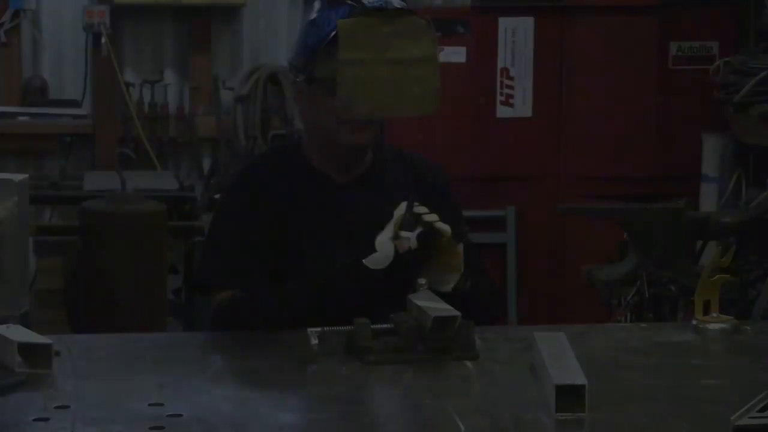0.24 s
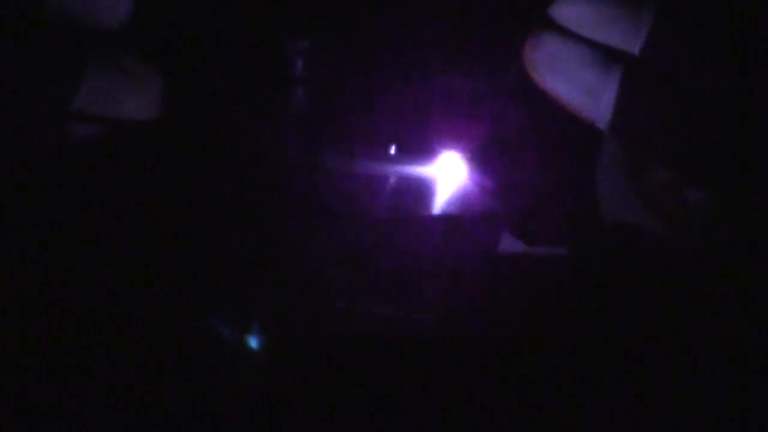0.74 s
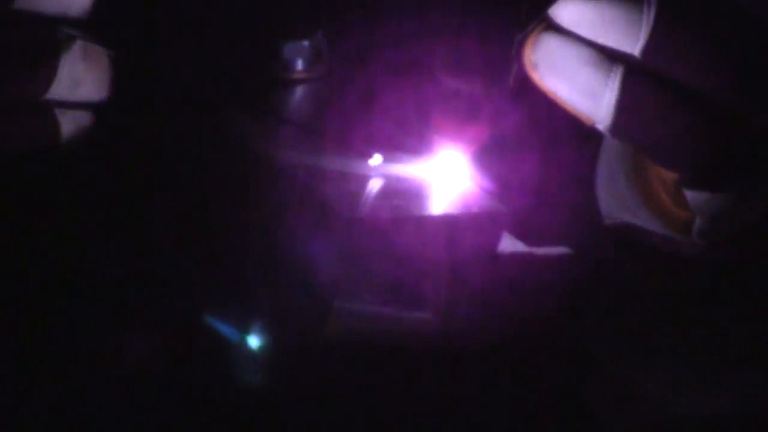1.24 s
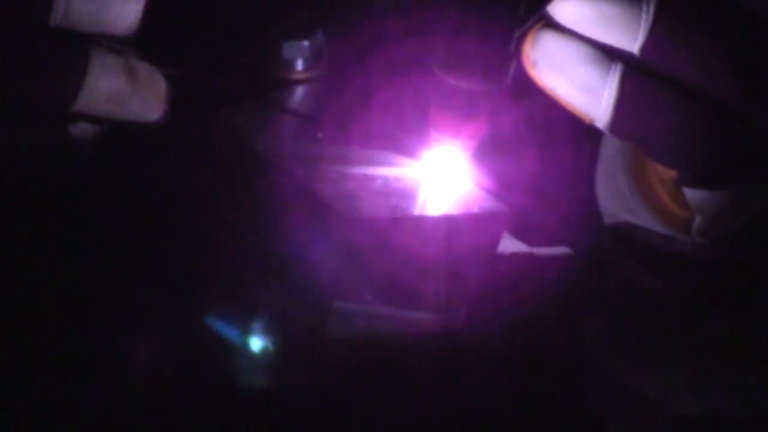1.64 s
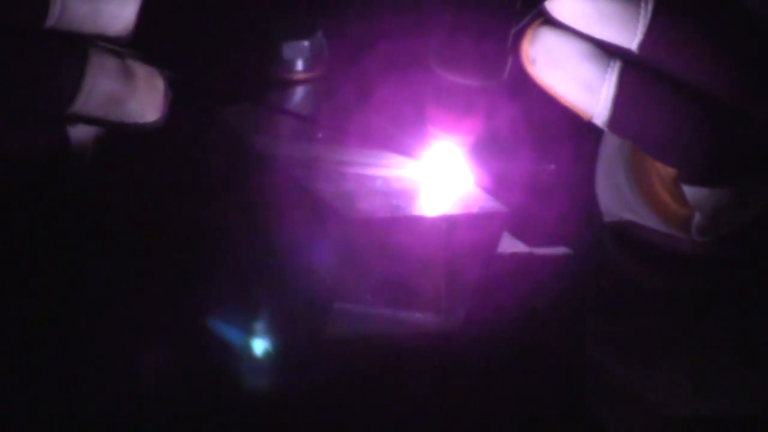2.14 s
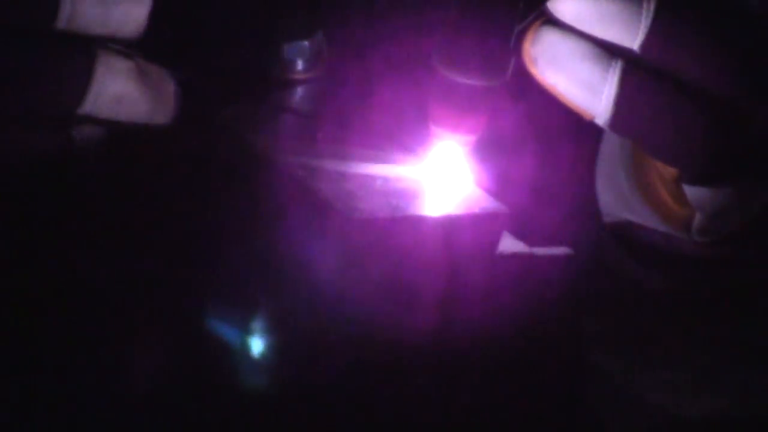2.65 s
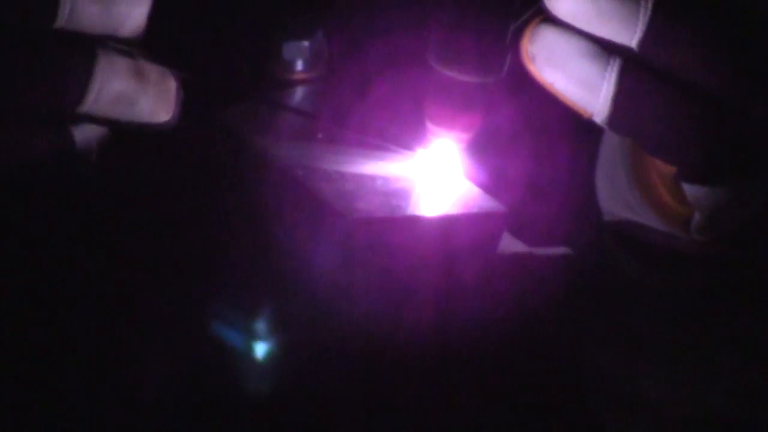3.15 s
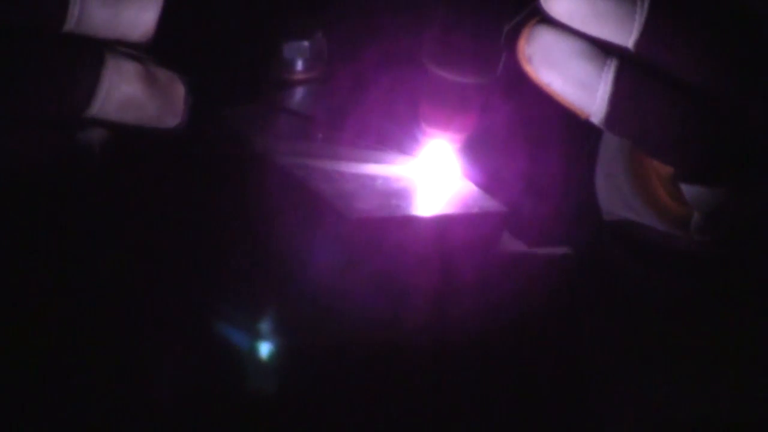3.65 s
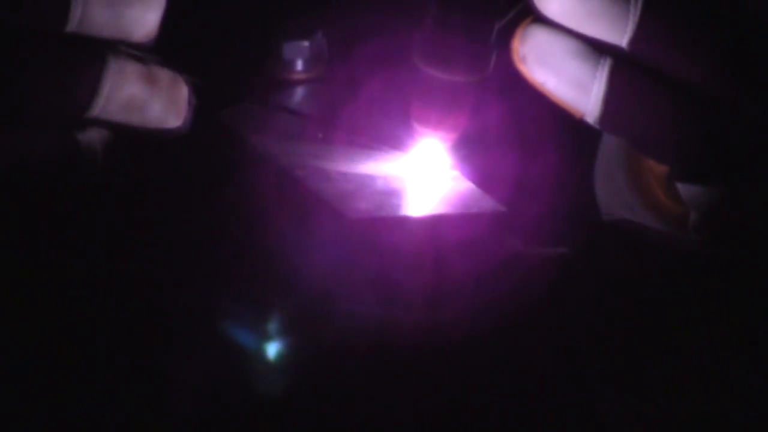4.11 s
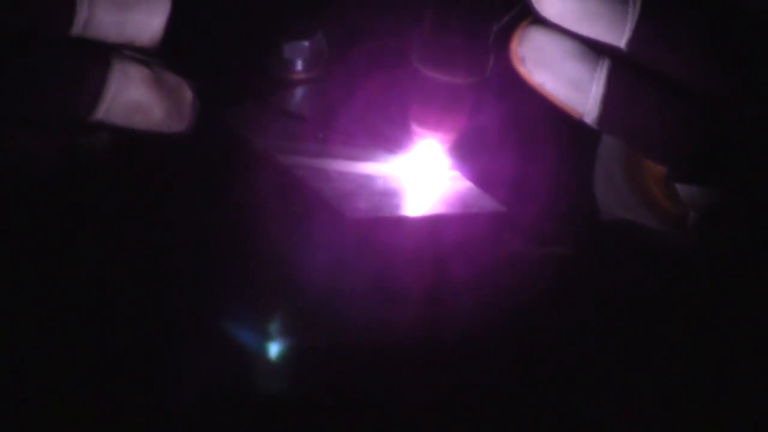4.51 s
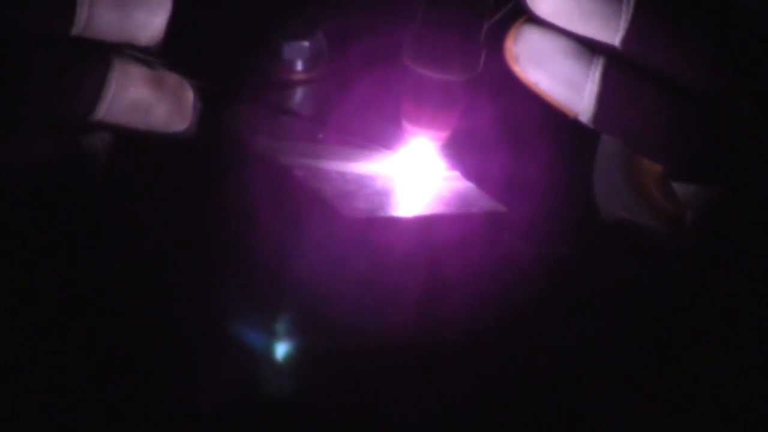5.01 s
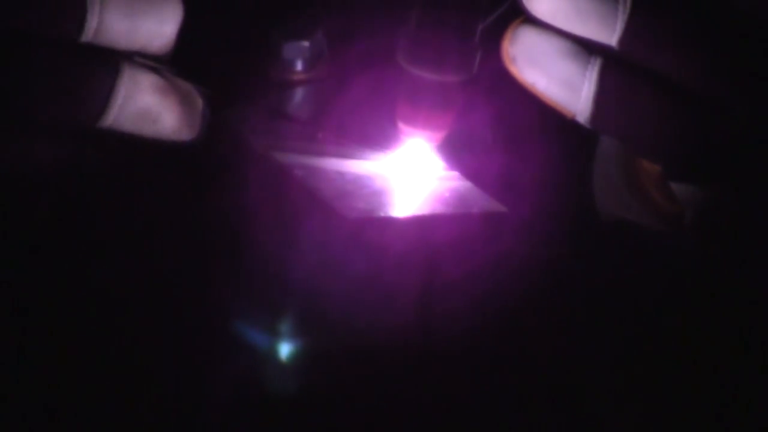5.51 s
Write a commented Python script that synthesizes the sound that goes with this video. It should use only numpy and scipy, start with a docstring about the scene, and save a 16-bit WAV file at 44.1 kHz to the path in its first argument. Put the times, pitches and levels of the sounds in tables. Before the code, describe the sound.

A fan and mains hum, then a spark hiss and popping strike start a hard, raspy welding buzz that holds steady to the end.

```python
"""An AC TIG arc burns on an aluminium tube: it snaps twice in every cycle of its current, a hard, even buzz.
Before it, a welder rustles and squeaks faintly, then the starter spark hisses in bursts.
The arc catches with a whistle and a run of pops; sizzling, thumps, more pops and a slowly growing low tone follow.
Echoes from the steel bench and the tube follow each snap. A fan drones and the mains hums in the workshop,
and the recorder's limiter pushes this background down as the current comes up."""
import sys
import numpy as np
from scipy import signal
from scipy.fft import rfft, irfft
from scipy.io import wavfile
from scipy.ndimage import map_coordinates

SR = 44100
rng = np.random.default_rng(int(sys.argv[2]) if len(sys.argv) > 2 else 0)


def generate_wav(sig):
    """Save sig (samples, or channels by samples) to the path in sys.argv[1] as 16-bit PCM at SR."""
    pcm = np.round(np.clip(np.atleast_2d(sig).T, -1, 1) * 32767).astype(np.int16)
    wavfile.write(sys.argv[1], SR, pcm)


N = 254456

ARC_HZ = 120.156  # cycles of the arc current per second; the mains hum has the same pitch
FIRST_SNAP_S = .6627  # the arc strikes
REVERSAL_S = .002317  # from the weak snap to the strong one in each cycle
MELT_S = .912  # the metal gives way to a pool
# the current ramps up after the strike, then holds
ARC_DB, FULL_CURRENT_S, CURRENT_POWER = 7, 0.99, 1.14

# tone colour of the arc: (frequency [Hz], relative level [dB])
SNAP_COLOUR = [(120, -31), (360, -4), (600, -2.5), (720, 1.5), (900, 3), (1300, -2), (1750, 7),
               (2600, -2.5), (3600, 0.5), (5000, -2), (7000, -4.5), (9000, -4), (12000, -5.5),
               (15700, -14.5)]
# spells in which the arc sizzles and thumps more, on the cold metal and later on the pool:
# (time [s], half length [s], added sizzle [dB], added thumping [dB]), both before the arc's own gain
LIVELY_SPELLS = [(0.81, 0.088, -15.5, -6), (1.47, 0.11, -33, -12), (2.732, 0.11, -27, -15),
                 (3.035, 0.21, -12.5, -23), (3.43, .14, -17.5, -39), (5.597, .08, -23, -12)]


def undb(db):
    """Decibels to gain."""
    return 10 ** (np.asarray(db) / 20)


def unit(x):
    """Scale to an average (rms) strength of 1."""
    return x / np.sqrt(np.mean(x ** 2))


def clock():
    """Time of every sample, in seconds."""
    return np.arange(N) / SR


def curves(table, t):
    """Read the columns of a table at times t, with straight lines between its rows."""
    s, *columns = np.transpose(table)
    return [np.interp(t, s, column) for column in columns]


def swell(t, centre_s, half_s):
    """A smooth rise and fall."""
    return np.exp(-((t - centre_s) / half_s) ** 2)


def colour(x, points):
    """Shape the tone through (Hz, dB) points with a filter that never answers before its input."""
    hz, db = np.transpose(points)
    size = 8192
    grid = np.maximum(np.arange(size // 2 + 1) * SR / size, 1)
    level_db = np.interp(np.log(grid), np.log(hz), db)
    # folding the cepstrum (spectrum of the log spectrum) puts the response after time zero
    cepstrum = irfft(np.log(undb(level_db)))
    cepstrum[1:size // 2] *= 2
    cepstrum[size // 2 + 1:] = 0
    response = irfft(np.exp(rfft(cepstrum)))
    return signal.fftconvolve(x, response)[:N]


def band_noise(hz, width_hz):
    """Noise in one steep resonance, rms 1."""
    f = np.arange(N // 2 + 1) * SR / N
    spectrum = rfft(rng.standard_normal(N))
    resonance = 1 / (1 + (np.abs(f - hz) / width_hz * 2) ** 4)
    return unit(irfft(spectrum * resonance, N))


def clicks(times, sizes):
    """Very short impulses, placed exactly even between two samples."""
    index = (times * SR).astype(int)[:, None] + np.arange(-7, 9)
    offset = index - times[:, None] * SR
    shape = np.sinc(offset) * np.cos(np.pi * offset / 16) ** 2
    return np.bincount(index.ravel(), (shape * sizes[:, None]).ravel(), N)[:N]


def puffs(times, sizes, hz):
    """Hot gas swells and collapses: one pressure swing each."""
    index = (times * SR).astype(int)[:, None] + np.arange(-256, 256)
    u = (np.pi * np.reshape(hz, (-1, 1)) * (index / SR - times[:, None])) ** 2
    swing = (2 * u - 1) * np.exp(-u)
    return np.bincount(index.ravel(), (swing * sizes[:, None]).ravel(), N)[:N]


def arc_gain(t):
    """Strength of the arc: silent before the strike, then growing with the current until it holds."""
    current = np.interp(t, [FIRST_SNAP_S, FULL_CURRENT_S], [0, 1])
    return undb(ARC_DB) * current ** CURRENT_POWER


def cycle_starts():
    """Times at which the electrode turns positive."""
    return np.arange(FIRST_SNAP_S, N / SR, 1 / ARC_HZ)


def workshop(air_db=-21.5, level_db=4.5):
    """Moving air is coloured noise; the fan's throbbing drone is noise in narrow bands."""
    # tone colour of the air: (frequency [Hz], relative level [dB])
    air_colour = [(15, -82), (25, -8), (64, -12.5), (117, -12), (170, -14), (249, -8), (317, -13),
                  (775, -19.5), (988, -26.5), (1190, -19.5), (1290, -24), (6920, -43), (12900, -55),
                  (16000, -50)]
    # the fan's drone: (frequency [Hz], width [Hz], level before level_db [dB])
    drone_bands = [(264.8, 12, -21.5), (245.2, 37.3, -18.5), (358, 16, -38), (466, 19, -40),
                   (813, 34, -41.5)]
    air = unit(colour(rng.standard_normal(N), air_colour)) * undb(air_db)
    fan = sum(undb(db) * band_noise(hz, width) for hz, width, db in drone_bands)
    return (air + fan) * undb(level_db)


def hum_and_arc_tone(hum_db=-20.0, waver_db=-24.5, waver_width_hz=12, arc_tone_db=-33, creep_db_per_s=4.0):
    """A wavering mains hum; once the arc burns, its own steady low tone at the same pitch slowly grows."""
    t = clock()
    # arc_tone_db is the level of the arc's tone at the moment of full current
    arc_tone = undb(arc_tone_db + creep_db_per_s * (t - FULL_CURRENT_S)) * (t >= FIRST_SNAP_S)
    steady = np.sqrt(2) * np.sin(2 * np.pi * ARC_HZ * t) * (undb(hum_db) + arc_tone)
    return steady + undb(waver_db) * band_noise(ARC_HZ, waver_width_hz)


def handling(bend_hz=260, waver_hz=50):
    """Faint squeaks, each rising and falling in pitch with its strength, and some rustling before the strike."""
    # thin squeaks as the welder settles:
    # (time [s], half length [s], highest pitch before wavering [Hz], level [dB])
    squeak_events = [(0.198, .038, 10570, -41), (.345, .055, 10000, -47), (0.377, .035, 10900, -47)]
    # tones within a squeak: (frequency ratio, relative level [dB])
    squeak_tones = [(.63, -7), (1, 6), (1.27, -3)]
    # gloves and sleeves rustle: (time [s], half length [s], peak level [dB])
    rustle_events = [(.087, 0.019, -34), (0.18, .003, -31), (.256, .003, -32), (0.365, .05, -38),
                     (0.465, 0.039, -40)]
    t = clock()
    squeak = np.zeros(N)
    for s, half, top_hz, db in squeak_events:
        bend = bend_hz * np.minimum(((t - s) / half) ** 2, 10)
        hz = top_hz - bend + waver_hz * band_noise(0, 300)
        phase = 2 * np.pi * np.cumsum(hz) / SR
        tone = sum(undb(tone_db) * np.sin(ratio * phase) for ratio, tone_db in squeak_tones)
        squeak += np.sqrt(2) * undb(db) * swell(t, s, half) * tone
    rustle = sum(undb(peak_db) * swell(t, s, half) for s, half, peak_db in rustle_events)
    return squeak + rustle * band_noise(11100, 4800)


def starter(spark_hz=560, depth=0.44):
    """A rapid train of high-voltage sparks hisses: noise pulsing in strength, in bursts that die away."""
    # bursts of the starter spark: (time [s], hiss level at its start [dB], decay [s])
    burst_events = [(.602, -21, 0.0041), (.6125, -4, 0.0013), (0.612, -11.5, 0.14), (0.662, -1.5, 0.0028),
                    (0.712, -11, 0.0096)]
    # tone colour of the spark: (frequency [Hz], relative level [dB])
    spark_colour = [(880, -53), (1500, -6), (2210, -6), (2390, -8), (2590, -28), (2910, -6), (3520, -11),
                    (4460, -15), (7390, -7), (12000, -2), (16000, -2.5)]
    t = clock()
    bursts = np.zeros(N)
    for s, db, decay in burst_events:
        bursts += undb(db) * np.exp(-np.maximum(t - s, 0) / decay) * (t >= s)
    train = rng.standard_normal(N) * (1 + depth * np.sin(2 * np.pi * spark_hz * t))
    return unit(colour(train, spark_colour)) * bursts


def whistle(hz=3550, sag_hz_per_s=1200, waver_hz=45, loudest_s=.703, half_s=0.037, level_db=-19,
            linger_db=-16, width_hz=110):
    """The torch whistles, a little falling, as the arc catches; narrow noise rings on until the metal melts."""
    t = clock()
    pitch = hz - sag_hz_per_s * (t - loudest_s) + waver_hz * band_noise(0, 300)
    tone = np.sqrt(2) * np.sin(2 * np.pi * np.cumsum(pitch) / SR)
    tone = tone * undb(level_db) * swell(t, loudest_s, half_s)
    # linger_db is the level before the arc's own gain
    ringing = band_noise(hz, width_hz) * undb(linger_db) * arc_gain(t) * (t < MELT_S)
    return tone + ringing


def buzz(scatter_db=0.43, jitter_s=1.2e-6, snap_db=-3.3):
    """The arc relights at both reversals of the current: a weak snap, then a strong one."""
    # balance of the two reversals: (time [s], weak snap relative to strong snap [dB])
    snap_balance = [(.9, -3.5), (1.35, -7), (2.3, -3.5), (2.9, -1), (3.72, -6), (3.83, -1), (4.2, -1),
                    (4.5, -4.5), (5.77, -8)]
    starts = cycle_starts()
    chance = rng.standard_normal((len(starts), 4)).T
    weak_db = curves(snap_balance, starts)[0] + scatter_db * chance[1]
    weak = clicks(starts + jitter_s * chance[0], undb(weak_db))
    strong = clicks(starts + REVERSAL_S + jitter_s * chance[2], undb(scatter_db * chance[3]))
    snaps = -unit(colour(weak + strong, SNAP_COLOUR))
    return snaps * undb(snap_db) * arc_gain(clock())


def sizzle(fade_s=0.0019, steady=0.23, grain_db=3, body_db=-23, spit_db=-19, spit_share=0.16):
    """Oxide crackles off while the electrode is positive, then dies away: a full body and a bright spitting."""
    t = clock()
    age = (t - FIRST_SNAP_S) % (1 / ARC_HZ)  # time since the cycle began
    gate = steady + np.exp(-np.maximum(age - REVERSAL_S, 0) / fade_s)
    grains = gate * rng.standard_normal(N) * undb(grain_db * rng.standard_normal(N))
    added = sum(undb(db) * swell(t, s, half) for s, half, db, _ in LIVELY_SPELLS)
    body = unit(colour(grains, SNAP_COLOUR)) * (undb(body_db) + added)
    bright = unit(colour(grains, [(2000, 3), (7000, -6.0), (10000, 8), (16000, 5)]))  # (Hz, dB)
    spit = bright * (undb(spit_db) + spit_share * added)
    return (body + spit) * arc_gain(t)


def pops(crack_lead_s=0.00058, scatter_db=1.5, jitter_s=.0003):
    """The arc flares in short runs: each pop is a short crack, then the swing of the gas."""
    # runs of pops, spaced by whole cycles of the current:
    # (time [s], length [s], spacing [cycles], typical peak [dB], pitch [Hz], crack relative to swing [dB])
    pop_runs = [(0.664, .004, 1, 1.5, 704, -2), (0.7194, .072, 1, 5.5, 650, -4.5),
                (1.347, .125, 2, 4.5, 560, -3), (1.738, .012, 1, 9.5, 463, -12),
                (1.789, .004, 1, 4, 337, -14), (1.822, .012, 1, 8.5, 298, -3),
                (3.818, .012, 1, 9.5, 625, -5)]
    out = np.zeros(N)
    for start, length, cycles, db, hz, crack_db in pop_runs:
        times = start + np.arange(0, length, cycles / ARC_HZ)
        chance = rng.standard_normal((len(times), 2)).T
        times = times + jitter_s * chance[0]
        sizes = undb(db + scatter_db * chance[1])
        out += puffs(times, sizes, hz)
        out += puffs(times - crack_lead_s, sizes * undb(crack_db), 2.0 * hz)
    return out


def thumps(hz=390, lag_s=0.00057, cold_db=9, calm_db=-22):
    """A gas thump follows each strong snap: firm on cold metal, soft and random once the pool has formed."""
    times = cycle_starts() + REVERSAL_S + lag_s
    added = sum(undb(db) * swell(times, s, half) for s, half, _, db in LIVELY_SPELLS)
    spread = undb(calm_db) + added
    sizes = undb(cold_db) * (times < MELT_S) + spread * rng.standard_normal(len(times))
    return puffs(times, sizes * arc_gain(times), hz)


def bench(x):
    """Near surfaces echo the arc; the paths change slowly as the torch travels."""
    # echoes from torch, tube, vice and bench:
    # (delay at the start [ms], gain [factor], change of delay along the seam [ms])
    echoes = [(0.387, -0.3, 0.015), (0.44, -0.28, -0.036), (0.527, 0.14, 0.14), (0.59, -0.45, 0.036),
              (0.716, -0.22, 0.027), (0.996, -0.26, 0.053), (1.095, 0.33, -0.0091), (1.13, -0.0036, -0.048),
              (1.37, -0.25, 0.018), (1.724, 0.18, 0.062), (2.118, -0.26, 0.034), (2.693, 0.22, 0.052),
              (2.755, -0.077, 0.23), (3.921, 0.023, 0.12), (4.09, 0.079, -0.083)]
    n = np.arange(N)
    out = x.copy()
    for delay_ms, gain, change_ms in echoes:
        lag = (delay_ms + change_ms * n / N) * SR / 1000  # in samples
        out += gain * map_coordinates(x, [n - lag], order=3)
    return out


def diffuse(x, t60_s):
    """Dense random reflections that die away by 60 dB in t60_s; the power is kept on the whole."""
    t = np.arange(SR // 2) / SR
    tail = rng.standard_normal(len(t)) * np.exp(-np.log(1000) * t / t60_s)
    return signal.fftconvolve(x, tail / np.linalg.norm(tail))[:N]


def clutter(x, corner_hz=6500, t60_s=0.048, level_db=-4.0):
    """Gloves, mask and tools scatter the short waves, differently in each pose, with blends between poses."""
    # the hands settle in a new pose: (time [s])
    pose_times = [.9, 2.0, 3.2, 4.2, 5.5]
    highpass = signal.butter(2, corner_hz, "high", fs=SR, output="sos")
    treble = signal.sosfilt(highpass, x)
    shares = [np.interp(clock(), pose_times, pose) for pose in np.eye(len(pose_times))]
    scattered = sum(np.sqrt(share) * diffuse(treble, t60_s) for share in shares)
    return x + undb(level_db) * scattered


def limiter(x, ceiling_db=6.0, attack_s=0.001, release_db_per_s=5.5):
    """The gain drops quickly when a peak passes the ceiling and recovers slowly."""
    over_db = 20 * np.log10(np.maximum(np.abs(x) / undb(ceiling_db), 1))
    recovery = release_db_per_s * clock()
    held_db = np.maximum.accumulate(over_db + recovery, axis=-1) - recovery
    pole = np.exp(-1 / (attack_s * SR))
    reduction_db = signal.lfilter([1 - pole], [1, -pole], held_db)
    return x * undb(-reduction_db)


def scene(room_t60_s=0.3, room_db=-20):
    """The arc over its bench, with a weak tail from the walls, in the droning workshop."""
    background = workshop() + hum_and_arc_tone() + handling()
    ignition = starter() + whistle()
    burning = buzz() + sizzle() + pops() + thumps()
    arc = clutter(bench(burning)) + ignition
    walls = undb(room_db) * diffuse(arc, room_t60_s)
    return (arc + walls + background)[None]


def record(dry):
    """The limiter holds the level, the peaks that slip past it clip, and the top is cut."""
    top_hz = 15900
    clipped = np.clip(limiter(dry), -.94, .94)
    lowpass = signal.ellip(12, .1, 75, top_hz, fs=SR, output="sos")
    return signal.sosfilt(lowpass, clipped)


dry = scene()
out = record(dry)
generate_wav(out)
```